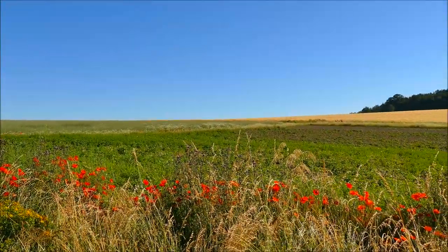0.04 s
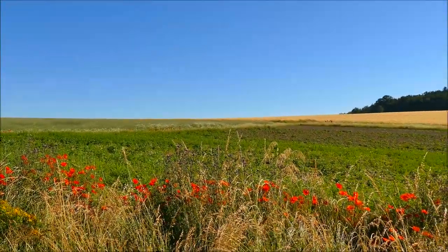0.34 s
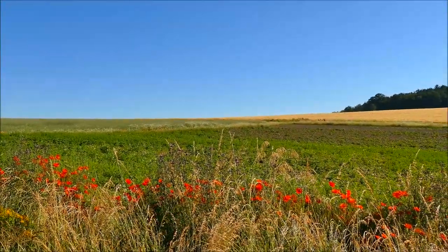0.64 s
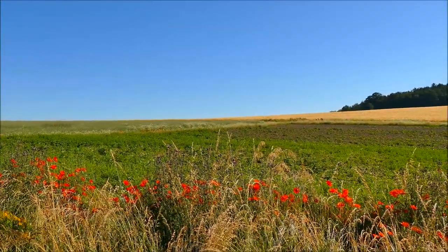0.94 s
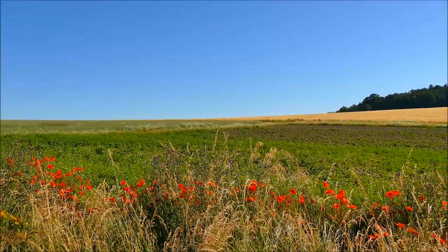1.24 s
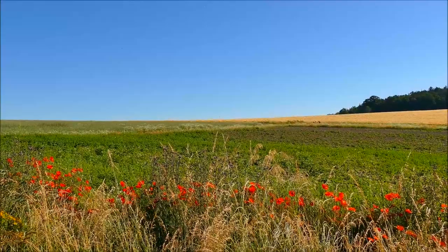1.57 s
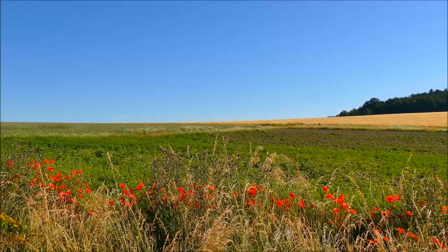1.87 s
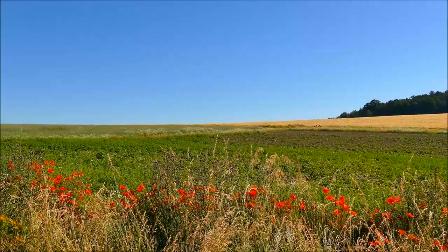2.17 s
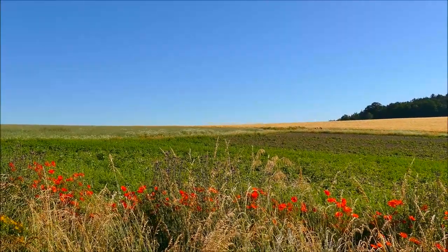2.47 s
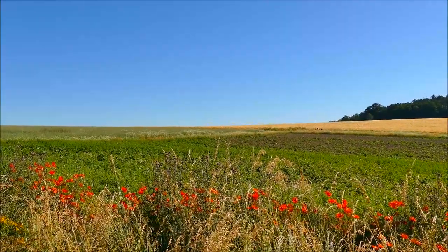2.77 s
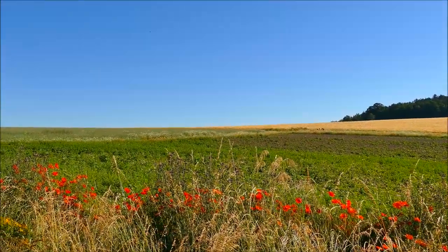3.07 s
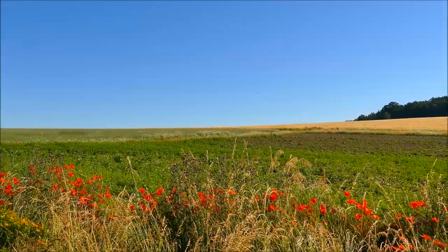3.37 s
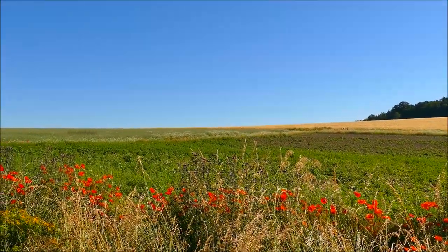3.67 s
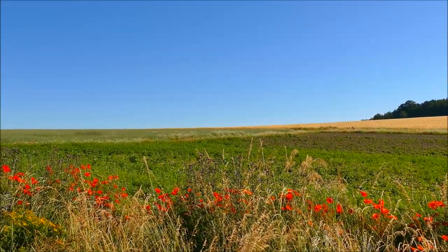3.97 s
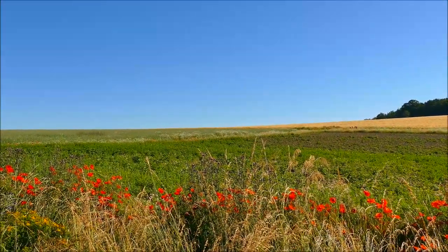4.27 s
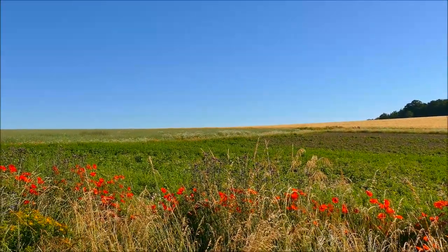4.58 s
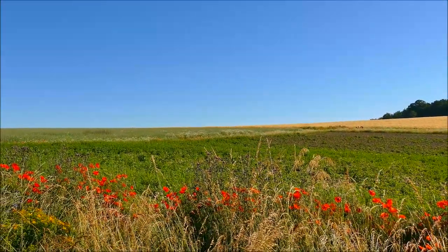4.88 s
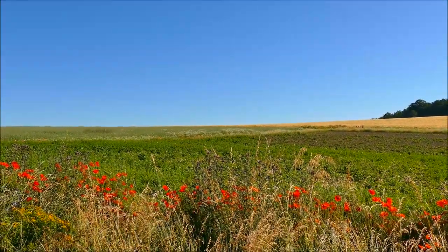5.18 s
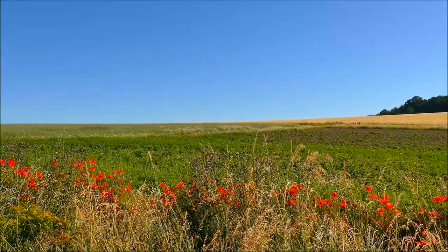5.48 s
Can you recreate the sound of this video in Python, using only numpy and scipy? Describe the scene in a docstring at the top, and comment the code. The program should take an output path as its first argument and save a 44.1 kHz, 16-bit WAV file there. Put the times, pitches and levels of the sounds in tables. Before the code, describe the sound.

A lark's quavering whistle breaks into fast chirps and trills above an open field, with soft wind and distant birdsong behind.

```python
"""A skylark's long, quavering whistle swells and bends down, then breaks into trills and twitters.
One bird is near, others sing farther off over open fields, all from the same stock of syllables:
swept whistles with faint overtones, sung singly, in short figures or repeated as trills.
The land returns a weak echo. Behind it lies a noise bed, a light breeze in the crops plus a haze
of distant lark song; now and then a puff of air bumps the microphone."""
import sys
import numpy as np
from scipy import signal
from scipy.fft import rfft, irfft, next_fast_len
from scipy.io import wavfile
from scipy.ndimage import uniform_filter1d, map_coordinates

SR = 44100
rng = np.random.default_rng(int(sys.argv[2]) if len(sys.argv) > 2 else 0)


def waveform_to_disk(signal):
    """Save audio, clipped to [-1, 1], as 16-bit WAV at the path in sys.argv[1]."""
    frames = np.transpose(np.atleast_2d(signal))
    scaled = np.clip(frames, -1, 1) * 32767
    samples = np.round(scaled).astype(np.int16)
    wavfile.write(sys.argv[1], SR, samples)


N = 243431

# The score; levels in all tables are relative. The long opening whistle: t/s, f/Hz, level/dB
OPENING_SLUR = [(0.118, 4960, -39.5), (0.168, 5035, -21), (0.272, 5286, -22.5), (0.32, 5150, -17.5),
                (0.362, 4660, -18.5), (0.4, 4280, -12), (0.42, 4070, -13.5), (0.43, 3810, -22.5),
                (0.437, 3710, -52)]
# main motif, twice near and twice farther off: t/s, twitter/dB, upslide/dB, whistle/dB, pitch ratio
MOTIFS = [ (0.9253, -16, -18.5, -12, 1.002), (1.2503, -16, -13.5, -8.5, 1.006),
          (3.0575, -24, -26, -23.5, .97), (3.3995, -32, -28, -28, .97), ]
# single syllables: t/s, syllable, level/dB, pitch ratio
SYLLABLE_CUES = [ (0.020, "descent", -40, 1.23), (0.057, "level", -45, 0.9), (0.531, "stairs", -11, 1.022),
                 (1.496, "descent", -35, 0.93), (1.573, "rasp", -21, .97), (1.735, "arch", -15, 1.008),
                 (1.882, "droop", -33.5, 0.93), (1.892, "tumble", -18, 1.105), (1.957, "level", -27.5, 1),
                 (2.047, "twitter", -33, 1.18), (2.088, "zip", -24, 0.75), (2.194, "warble", -25, 0.94),
                 (2.426, "level", -45, .86), (2.622, "stairs", -23.5, 1.01), (3.019, "warble", -35.5, 1),
                 (3.716, "drawl", -49, 1), (3.881, "droop", -39, 0.94), (3.925, "arch", -31.5, 0.97),
                 (3.960, "level", -32.5, 1.02), (4.057, "twitter", -37, 1.12),
                 (4.0881, "tumble", -35, 1.03), (4.141, "sag", -32.5, 1.34), (4.207, "warble", -33.5, 0.95),
                 (4.633, "slide", -34, 0.96), (4.648, "peep", -36, 0.99), (4.720, "pair", -30, 0.85),
                 (4.757, "chur", -29.5, 1.026), (4.805, "flick", -34.5, .7), (4.853, "climb", -24, 1.007),
                 (4.912, "peep", -22.5, 1), (4.989, "lift", -25, 1.2), (5.014, "lift", -26.5, 0.89),
                 (5.031, "fall", -26, .99), (5.155, "lift", -32.5, .97), (5.308, "stairs", -27, 0.97),
                 (5.486, "hook", -31.5, .85), ]
# trills: start/s, end/s, syllable, period/ms, mid level/dB, crescendo/dB, first and last pitch ratio
TRILLS = [ (0.210, 0.530, "buzz", 7.5, -40, 2, .7, .665),
          (0.531, 0.725, "buzz", 6.7, -31.5, -3, 1.02, 0.98),
          (0.6873, 0.870, "hook", 21.8, -15, 4, .95, 1.005),
          (0.7805, 1.030, "pair", 30.1, -26, 2, 1.06, .935),
          (1.155, 1.340, "lift", 25.5, -32, 4, 1.02, 1.01),
          (1.5907, 1.695, "rasp", 19.4, -10, 0, 1.005, 1.005),
          (2.1037, 2.210, "zip", 12.75, -17.5, 2, 1, 1.073),
          (2.217, 2.430, "chip", 12.9, -17, -3, 1.006, 1), (2.258, 2.365, "dot", 32.6, -28.5, 4, 0.996, 1),
          (2.454, 2.650, "buzz", 8, -23, -3.5, 1.024, 0.98),
          (2.723, 2.970, "pair", 29.8, -20.5, -1, 1.045, .915),
          (2.7888, 2.975, "hook", 22.4, -22, 7, .91, 1.01),
          (3.164, 3.370, "lift", 25, -24.5, -9, 1.005, .98),
          (3.428, 3.460, "tick", 8.3, -35.5, 16, 1.6, 1.33),
          (3.518, 3.740, "chip", 9.9, -37.5, -3, 0.6, 0.73),
          (3.745, 3.890, "rasp", 20.1, -28.5, -3, 0.95, .91), (4.268, 4.380, "dot", 31.7, -30.5, 2.5, 1, 1),
          (4.283, 4.631, "tick", 11.7, -38.5, 7, 1.29, 1.36),
          (4.458, 4.600, "tick", 12, -33.5, 6, .98, 1.05),
          (4.746, 4.782, "tick", 5.8, -31.5, 7, 0.78, 1.02), (4.849, 5.000, "dot", 14, -35, 4, 1.52, 1.66),
          (5.079, 5.112, "buzz", 5.2, -27, -14, 0.81, 0.614),
          (5.181, 5.236, "tick", 9.9, -39, -5, 0.673, 0.61), ]
# notes on one arc of pitch, by name: length/ms, start f/Hz, middle f/Hz, end f/Hz, crescendo/dB
PLAIN_NOTES = { "upslide": (27.3, 5600, 5500, 6640, 5.2), "slide": (20.5, 6600, 5337, 4950, 4),
               "droop": (53, 6001.5, 5745, 5618, -4), "level": (56, 3935, 3867, 3784, -2),
               "fall": (154, 4560, 4031, 3790, -9.5), "peep": (40, 4200, 4484, 4400, 1),
               "chur": (41.7, 3150, 3200, 3040, 5), "drawl": (166, 4377, 4397, 4402, -5),
               "sag": (18.5, 4440, 4243, 3852, 7), "lift": (11, 4500, 4836, 5150, -2.5),
               "step": (11.3, 4020, 3920, 3830, 0), "dot": (15.5, 2914, 2900, 2866, 2),
               "flick": (9.5, 3850, 3445, 2787, -7.5), "scrape": (7.8, 3950, 3600, 3100, -5),
               "tick": (6.5, 3552, 3712, 3870, -23), "stroke": (3.5, 5650, 5001, 4298.5, 9.5), }
# notes with a kink, by name: t/ms, f/Hz, level/dB
KINKED_NOTES = { "whistle": [(0, 6900, -18), (5, 5750, -3), (22, 5050, 0), (31, 3900, -6), (41, 4320, -1),
                (54, 3740, -3), (84, 3680, -3), (138, 3860, 1.5), (156, 3780, -6)], "hook": [(0, 1840, -23),
                (9.5, 1920, -20), (13, 3000, 0), (15.5, 3100, -5), (18, 2900, -24)],
                "chip": [(0, 5600, -12), (1.5, 5000, -1), (3, 4700, -4), (4.5, 5300, 0), (6.5, 4850, -1),
                (8.5, 4550, -14)], "buzz": [(0, 4750, -7), (1.8, 4900, -4), (3.3, 5450, 0), (5.1, 4780, -6),
                (7, 4620, -10)], }
# a note repeated in one breath, by name: note, count, period/ms, pitch ratio per step, level step/dB
RUNS = { "pair": ("step", 2, 12, 0.96, -1.8), "rasp": ("scrape", 2, 10, .975, -7),
        "zip": ("stroke", 2, 3.86, 0.94, 1.2), "warble": ("sag", 2, 21, 1.1, 2.5),
        "descent": ("step", 5, 11, 0.9244, -0.16), "stutter": ("flick", 3, 16, 1.045, 0),
        "climb": ("flick", 3, 19.7, 1.1, 1.1), "rattle": ("tick", 4, 9.5, 0.97, 0), }
# set figures of notes and runs, by name: t/ms, part, level/dB, pitch ratio
FIGURES = { "stairs": [(0, "lift", -8, 0.92), (16.5, "flick", -3, 0.98), (31.5, "tick", 0, 1.125),
           (44, "step", -1.5, 1.434), (55.7, "slide", 0.5, 0.993), (74.5, "descent", -2, 1.19)],
           "tumble": [(2.06, "pair", 0, 0.87), (30.5, "stutter", 0.5, 0.77), (82.4, "rattle", -8, 0.622)], }
# second partial of the brighter notes ahead of the throat, by name: level/dB
OVERTONE_DB = {"slur": -36, "whistle": -36, "arch": -21, "stroke": -25, "chip": -31, "scrape": -30}
# how the throat passes the overtones: second partial f/Hz, gain/dB
THROAT_EQ = [(7000, -1.5), (8500, -3.5), (10000, 5.5), (11500, -2)]
# syllables that carry far: name
FAR_SYLLABLES = ["stairs", "twitter", "tumble", "climb", "stairs", "warble", "pair", "rasp", "descent",
                 "chur"]
# puffs of air on the microphone: t/s, peak level/dB
PUFFS = [(0.657, -39), (1.509, -45), (1.951, -36.5), (1.999, -38.5), (3.246, -38), (4.843, -37),
         (5.135, -41)]
# tone colour of the background bed (breeze, plus a haze of distant lark song near 4.5 kHz): f/Hz, level/dB
BED_EQ = [(15, -41), (25, -8.5), (100, -4), (284, -2.5), (361, 1), (425, -2), (604, -1.5), (1820, -11.5),
          (4500, -9), (8300, -19), (15800, -19)]
# slow swell of the bed: t/s, level/dB
BED_SWELL = [(0.0, -46), (0.78, -45), (5.52, -47)]
# stereo image of the bed: f/Hz, left-right correlation
BED_CORRELATION = [(100, 0.98), (1500, 0.98), (4000, 0.97), (12000, 0.87)]


def larks(slip_ms=0.055, mistune=0.0066, sag_db=3):
    """The lead birds; a trill swells, fades and drifts in pitch, no two of its syllables quite alike."""
    song = np.zeros(N)
    add(song, OPENING_SLUR[0][0], slur())
    for s, twitter_db, upslide_db, whistle_db, pitch in MOTIFS:
        add(song, s, amp(twitter_db) * syllable("twitter", pitch))
        add(song, s + 0.0585, amp(upslide_db) * syllable("upslide", pitch))
        add(song, s + 0.0942, amp(whistle_db) * syllable("whistle", pitch))
    for s, name, db, pitch in SYLLABLE_CUES:
        add(song, s, amp(db) * syllable(name, pitch))
    for start, end, name, period_ms, db, crescendo_db, first, last in TRILLS:
        times = np.arange(start, end, period_ms / 1000)
        jitter = rng.standard_normal((len(times), 3))
        for s, u, (late, sharp, loud) in zip(times, np.linspace(0, 1, len(times)), jitter):
            pitch = (first + u * (last - first)) * (1 + mistune * sharp)
            swell_db = crescendo_db * (u - .5) + bow(u, -sag_db, 0, -sag_db)
            add(song, s + late * slip_ms / 1000, amp(db + swell_db + .6 * loud) * syllable(name, pitch))
    return song


def syrinx(hz, gain, overtone_db):
    """The voice: a nearly pure, unsteady whistle; the throat passes its overtones best near 10 kHz."""
    wavering_hz = hz * (1 + .0015 * wobble(len(hz), 250))
    phase = 2 * np.pi * np.cumsum(wavering_hz) / SR
    shimmer = amp(.35 * wobble(len(hz), 120))
    third_db = overtone_db * 0.43  # the purer the tone, the faster its overtones fall away
    overtones = np.sin(2 * phase) + amp(third_db) * np.sin(3 * phase)
    brightness = amp(overtone_db + along(THROAT_EQ, 2 * hz))
    return gain * shimmer * (np.sin(phase) + brightness * overtones)


def slur(trim_db=3, quaver=0.0063):
    """A long, slightly quavering whistle that grows louder as it bends down."""
    s, hz, db = np.transpose(OPENING_SLUR)
    t = np.arange(s[0], s[-1], 1 / SR)
    pitch = np.interp(t, s, hz) * (1 + quaver * wobble(len(t), 134.5))
    gain = amp(np.interp(t, s, db) + trim_db) * fades(1000 * (t - s[0]))
    return syrinx(pitch, gain, OVERTONE_DB["slur"])


def syllable(name, pitch, plain_overtone_db=-37):
    """One note, or a run or figure built of notes, transposed by a pitch ratio."""
    if name in RUNS:
        note, repeats, period_ms, ratio, step_db = RUNS[name]
        parts = [(k * period_ms, note, k * step_db, ratio ** k) for k in range(round(repeats))]
    elif name in FIGURES:
        parts = FIGURES[name]
    else:
        hz, gain = contour(name)
        return syrinx(pitch * hz, gain, OVERTONE_DB.get(name, plain_overtone_db))
    sound = np.zeros(SR // 5)
    for ms, part, db, ratio in parts:
        add(sound, ms / 1000, amp(db) * syllable(part, pitch * ratio))
    return sound


def contour(name):
    """Pitch and gain envelopes of one unbroken note."""
    if name in PLAIN_NOTES:
        length_ms, start_hz, middle_hz, end_hz, crescendo_db = PLAIN_NOTES[name]
        t = clock_ms(length_ms)
        u = t / length_ms
        return bow(u, start_hz, middle_hz, end_hz), amp(crescendo_db * (u - .5)) * fades(t)
    if name in KINKED_NOTES:
        ms, hz, db = np.transpose(KINKED_NOTES[name])
        t = clock_ms(ms[-1])
        rounded = lambda values: uniform_filter1d(np.interp(t, ms, values), size=len(t) // 36)
        return rounded(hz), amp(rounded(db)) * fades(t, fade_ms=.045 * t[-1])
    return {"twitter": twitter, "arch": arch}[name]()


def twitter(length_ms=34, first_period_ms=4.37, slowing=0.226, shake_hz=560, shake_db=4, dip_turn=0.27):
    """A falling note with a fast vibrato that slows; it weakens just after each crest of pitch."""
    t = clock_ms(length_ms)
    u = t / length_ms
    turns = np.log1p(slowing * t / first_period_ms) / slowing
    hz = bow(u, 4550, 4220, 2630) + shake_hz * np.cos(2 * np.pi * turns)
    db = bow(u, -6, 1.5, -11) - shake_db * np.cos(2 * np.pi * (turns - dip_turn))
    return hz, amp(db) * fades(t, fade_ms=1.0)


def arch(length_ms=132, top_hz=4600, shoulder_hz=520, period_ms=23.5, jump_hz=650, accent_db=14):
    """A swelling arch with four evenly spaced accents, each a jump in pitch that settles at once."""
    t = clock_ms(length_ms)
    u = t / length_ms
    onsets_ms = 21 + period_ms * np.arange(4)

    def accents(decay_ms):
        spikes = sum((t > onset) * np.exp(-abs(t - onset) / decay_ms) for onset in onsets_ms)
        return uniform_filter1d(spikes, size=90)

    hz = top_hz - shoulder_hz * abs(2 * u - 1) ** 3 + jump_hz * accents(decay_ms=1.2)
    db = bow(u, -7, -11, 2.7) + accent_db * accents(decay_ms=7)
    return hz, amp(db) * fades(t, fade_ms=8)


def far_larks(count, trim_db, spread_db=3):
    """Birds across the fields chatter the same syllables in their own order."""
    song = np.zeros(N)
    for k, (when, which, tune, loud) in enumerate(rng.random((count, 4))):
        name = FAR_SYLLABLES[int(which * len(FAR_SYLLABLES))]
        call = syllable(name, pitch=1 + 0.13 * (tune - .5))
        db = trim_db + spread_db * (2 * loud - 2.5)
        add(song, (k + when) / count * N / SR, amp(db) * call)
    return song


def land_echo(song, t60_s, wet_db):
    """Crops and the wood's edge scatter a thin tail back."""
    t = np.arange(SR // 2) / SR
    tail = rng.standard_normal(len(t)) * amp(-60 * t / t60_s)
    return amp(wet_db) * signal.fftconvolve(song, tail / np.linalg.norm(tail))[:N]


def wind_bumps(hz=90, length_ms=50, trim_db=-2):
    """Each puff of air gives the microphone a few soft low cycles."""
    track = np.zeros(N)
    size = len(clock_ms(length_ms))
    for s, db in PUFFS:
        phase = 2 * np.pi * np.cumsum(hz * (1 + 0.1 * wobble(size, 95))) / SR
        add(track, s - .015, amp(db + trim_db) * np.hanning(size) * np.sin(phase))
    return track


def breeze_and_lark_haze(trim_db=3, flutter_db=0.86):
    """A soft noise bed of moving air and distant song, nearly centred, a little wider in the treble."""
    def mid_side_eq(hz):
        width = np.arccos(along(BED_CORRELATION, hz)) / 2
        return amp(along(BED_EQ, hz)) * [np.cos(width), np.sin(width)]

    mid, side = filtered(rng.standard_normal((2, N)), mid_side_eq)
    swell_db = np.interp(np.arange(N) / SR, *np.transpose(BED_SWELL))
    gain = amp(swell_db + flutter_db * wobble(N, 6.34) + trim_db)
    return gain * unit_rms(np.array([mid + side, mid - side]))


def amp(db):
    return 10 ** (np.asarray(db) / 20)


def unit_rms(x):
    return x / np.sqrt(np.mean(x ** 2) + 1e-20)


def along(points, hz):
    """Read a curve of (f/Hz, value) points on a log frequency axis."""
    f, v = np.transpose(points)
    return np.interp(np.log(hz + 1), np.log(f + 1), v)


def filtered(x, response):
    """Zero-phase EQ; response gives the gain at each frequency."""
    size = next_fast_len(N + SR // 4)
    return irfft(rfft(x, size) * response(np.fft.rfftfreq(size, 1 / SR)), size)[..., :N]


def add(track, s, sound):
    """Mix a sound into a track at s seconds."""
    start = max(round(s * SR), 0)
    part = track[start:start + len(sound)]
    part += sound[:len(part)]


def wobble(size, rate):
    """A smooth random modulator, rate knots a second."""
    knots = rng.standard_normal(int(size * rate / SR) + 4)
    return map_coordinates(knots, [np.arange(size) * rate / SR])


def clock_ms(length_ms):
    return np.arange(0, max(length_ms, 1), 1000 / SR)


def bow(u, start, middle, end):
    """A smooth arc through three values as u runs from 0 to 1."""
    return start + u * (end - start) + 4 * u * (1 - u) * (middle - (start + end) / 2)


def fades(t, fade_ms=5.9, max_share=0.6):
    """Soft attack and release, together taking at most max_share of the note."""
    return signal.windows.tukey(len(t), min(max_share, 2 * fade_ms / t[-1]))


def scene():
    """The singers sit dead centre over the background bed; the farther ones blur into a thin chorus."""
    song = larks() + far_larks(count=70, trim_db=-40)
    echo = land_echo(song, t60_s=.42, wet_db=-24.5)
    chorus = far_larks(count=130, trim_db=-49.5)
    chorus_blur = land_echo(chorus, t60_s=0.17, wet_db=2)
    return song + echo + chorus + chorus_blur + wind_bumps() + breeze_and_lark_haze()


def record(dry, top_hz=15850):
    """A brick-wall low-pass takes the very top off the mix."""
    return filtered(dry, lambda hz: hz < top_hz)


dry = scene()
out = record(dry)
waveform_to_disk(out)
```